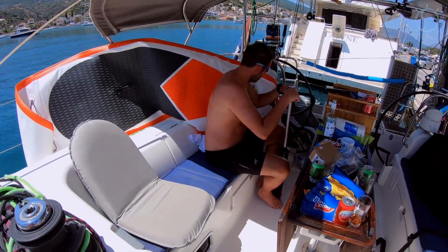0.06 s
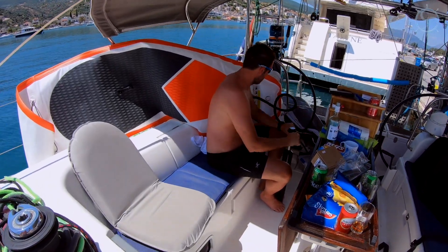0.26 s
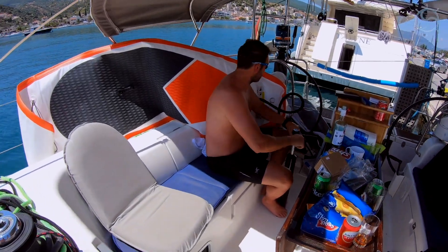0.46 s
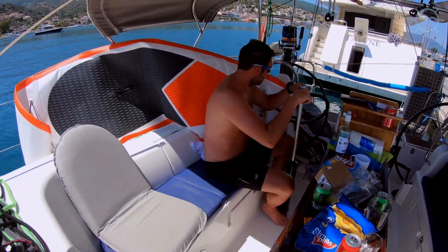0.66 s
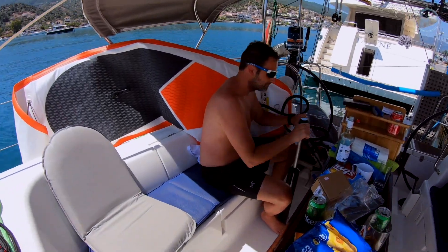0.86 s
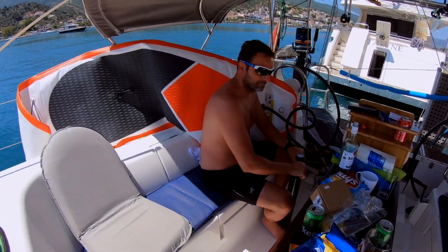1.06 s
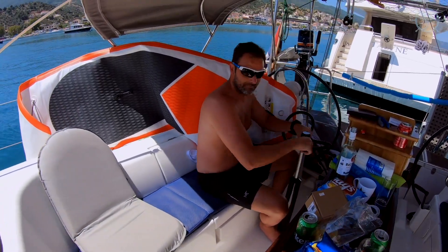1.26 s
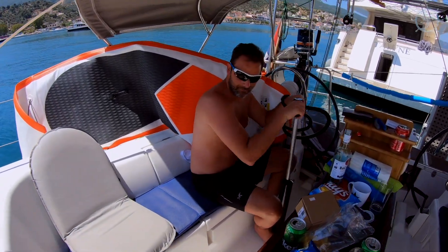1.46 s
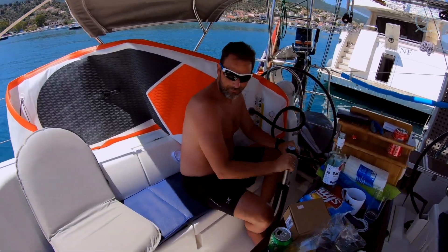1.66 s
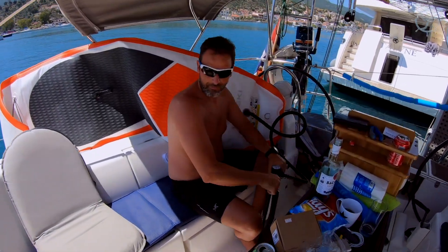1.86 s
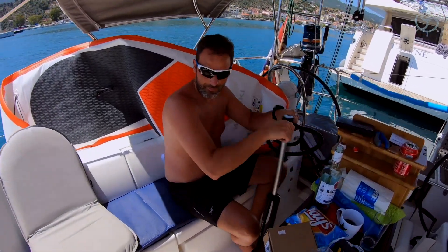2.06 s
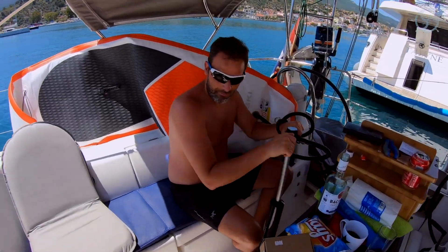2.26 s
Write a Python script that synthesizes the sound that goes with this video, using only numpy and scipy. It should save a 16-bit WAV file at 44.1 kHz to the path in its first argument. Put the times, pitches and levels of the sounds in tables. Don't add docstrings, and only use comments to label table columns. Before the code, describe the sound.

A hand pump close by gives three shrill, breathy whistling down-strokes, each followed by a softer rising hiss and a dull knock, over low generator hum and water rumble outdoors, on a small stereo camera microphone.

```python
import sys
import numpy as np
from scipy import signal
from scipy.io import wavfile
from scipy.ndimage import uniform_filter1d

SR = 44100
rng = np.random.default_rng(int(sys.argv[2]) if len(sys.argv) > 2 else 0)


def put_to_file(sound):
    columns = np.atleast_2d(sound).T
    safe = np.clip(columns, -1, 1)
    whole_steps = np.round(safe * 32767)
    wavfile.write(sys.argv[1], SR, whole_steps.astype(np.int16))


def rack_gain(trim_db):
    fader = np.asarray(trim_db, float)
    return 10 ** (fader / 20)


N = 101429
TIME = np.arange(N) / SR
MIRROR = np.array([[1], [-1]])

# t/s, level/dB
AIRFLOW = [(.125, -68), (.17, -58), (.24, -48.5), (.29, -51.5), (.37, -53), (.46, -71), (.85, -69.5),
           (.88, -52.5), (.96, -47.5), (1.04, -49.5), (1.12, -54.5), (1.21, -68), (1.575, -68.5),
           (1.61, -52), (1.67, -47), (1.71, -53), (1.82, -50.5), (1.92, -70)]
# t/s, f/Hz, level/dB
VORTEX = [(.15, 2600, -73.5), (.2, 3242, -50.5), (.25, 4205, -29.5), (.32, 4060, -43), (.385, 3300, -50),
          (.425, 2773, -51), (.47, 2500, -81), (.861, 2700, -100), (.89, 2773, -48.5), (.94, 3422, -38.5),
          (.97, 4091, -32.5), (1.02, 3907, -36), (1.097, 3342, -36.5), (1.147, 2675, -45),
          (1.17, 2480, -47), (1.2, 2408, -97), (1.59, 2266, -62.5), (1.64, 2920, -50), (1.675, 3700, -32.5),
          (1.752, 4174, -45.5), (1.815, 3350, -44.5), (1.86, 2750, -41), (1.92, 2600, -90)]
NOZZLE_MODE_HZ = 3350
ECHO_DB = -9.5


def in_time(rows):
    s, *columns = np.transpose(rows)
    return [np.interp(TIME, s, c) for c in columns]


def at_hz(points, hz):
    point_hz, point_db = np.transpose(points)
    return np.interp(np.log(hz), np.log(point_hz), point_db)


def rms_one(x):
    return x / np.sqrt(np.mean(np.abs(x) ** 2) + 1e-20)


def drift(rate, size=1):
    settle = SR // 4
    r = np.exp(-2 * np.pi * rate / SR)
    white = rng.standard_normal((size, N + settle))
    return rms_one(signal.lfilter([1], [1, -2 * r, r * r], white)[:, settle:])


def spin(hz):
    return np.exp(2j * np.pi * np.cumsum(hz) / SR)


def banded_noise(spectrum, patchy_db):
    # f/Hz, correlation/1
    likeness = [(30, 0.42), (90, 1), (180, 1), (300, 0.95), (600, 0.68), (1300, 0.44), (2800, 0.68),
                (6000, 0.17)]
    edges = 18 * 2 ** np.arange(0, 10, .5)
    out, white, flicker = 0, rng.standard_normal((2, 2, N)), drift(7.2, size=4)
    for k, (low, high) in enumerate(zip(edges, edges[1:])):
        band_pass = signal.butter(2, [low, high], "band", fs=SR, output="sos")
        mid, side = signal.sosfilt(band_pass, white[k % 2])
        hz = np.sqrt(low * high)
        alike = np.clip(at_hz(likeness, hz), -1, 1)
        gain = rack_gain(at_hz(spectrum, hz) + patchy_db * flicker[k % 4])
        out = out + gain * (np.sqrt(1 + alike) * mid + np.sqrt(1 - alike) * side * MIRROR)
    return rms_one(out)


def deck(x, echo_db):
    echo_s = [.0021, .0034, .0057, .0079]
    late = [np.roll(x, int(s * SR)) * rack_gain(echo_db) for s in echo_s]
    ears = np.array([x + late[0] - late[2], x - late[1] + late[3]])
    return ears / np.sqrt(1 + 2 * rack_gain(2 * echo_db))


def harbour():
    # f/Hz, level/dB per Hz
    rumble = [(20, -13), (38, 8), (185, -5), (1140, -24.5), (3200, -26), (3950, -33), (6860, -56.5),
              (7830, -69), (13600, -101)]
    return rack_gain(-41) * banded_noise(rumble, patchy_db=2.37)


def generator():
    # f/Hz, level/dB, width/Hz
    hum = [(100.65, -42, 17), (150.7, -45.5, 3.9), (74, -50.5, 6)]
    out = 0
    for hz, db, width in hum:
        a, b, c, d = drift(width, size=4)
        waver = .9 + .55 * (a + 1j * b) + .17 * (c + 1j * d) * MIRROR
        out = out + rack_gain(db) * np.real(waver * np.exp(2j * np.pi * hz * TIME))
    return out


def knocks():
    # t/s, thud level/dB, puff level/dB, hardness/dB per octave
    hits = [
        (0.014, -30, -51, -0.5),
        (0.49, -49, -47.5, 3),
        (0.718, -31, -55.5, 1.5),
        (0.935, -24.5, -56, -20),
        (1.23, -36, -48, 2.5),
        (1.442, -27.5, -53, -2),
        (1.54, -34, -75, -14),
        (1.939, -32.5, -40, 1),
        (2.179, -27, -60, -9.5),
        (2.261, -60, -50.5, 0),
    ]
    # f/Hz, level/dB, t60/s
    barrel = [(174.4, -9.5, 0.12), (267, 0.5, 0.066), (406, -6.5, 0.1), (724, -6, 0.013),
              (1170, -13, 0.022)]
    # f/Hz, level/dB per Hz
    puff_spectrum = [(600, 9.5), (2000, 5), (3000, 10), (4500, -1), (6500, -1), (10000, -27)]
    puff_rise_s, puff_fall_s = .008, .012
    thuds, puffs = np.zeros(N), np.zeros(N)
    s, thud_db, puff_db, hard_db = np.transpose(hits)
    for hz, level_db, t60 in barrel:
        clicks = np.full(N, 1e-18)
        octaves_up = max(np.log2(hz / barrel[1][0]), 0)
        for lag, loss_db in [(0, -14), (.006, -3)]:
            hit_db = thud_db + level_db + loss_db + hard_db * octaves_up + rng.normal(0, 2, len(s))
            clicks[((s + lag) * SR).astype(int)] = rack_gain(hit_db)
        r, w = rack_gain(-60 / (t60 * SR)), 2 * np.pi * hz / SR
        thuds += signal.lfilter([0, np.sin(w)], [1, -2 * r * np.cos(w), r * r], clicks)
    for start, level_db in zip(s, puff_db):
        age = np.maximum(TIME - start + puff_rise_s, 0)
        fall = np.exp(-np.maximum(age - puff_rise_s, 0) / puff_fall_s)
        puffs += rack_gain(level_db) * np.minimum(age / puff_rise_s, 1) * fall
    return thuds + puffs * banded_noise(puff_spectrum, patchy_db=1.5)


def jet():
    # f/Hz, climb/Hz per Hz of vortex pitch, level over the hiss/dB
    valve = [(6330, 0.18, -1.5), (5480, 0.36, -8), (7310, 0.43, 1)]
    hz, flow_db, out = in_time(VORTEX)[0], in_time(AIRFLOW)[0], 0
    gathering = (np.gradient(hz) > 0) * (flow_db > -62)
    rising = uniform_filter1d(gathering * 1., size=800) * rack_gain(flow_db)
    for centre_hz, climb, level_db in valve:
        a, b, c, d = drift(220, size=4)
        pitch = centre_hz + climb * (hz - NOZZLE_MODE_HZ)
        out = out + rack_gain(level_db) * np.real(np.array([a + 1j * b, c + 1j * d]) * spin(pitch))
    return out * rising


def piston():
    # f/Hz, level/dB per Hz
    hiss = [(300, -8), (1200, 4.5), (2500, 7), (5000, 3), (6200, 0), (8500, 4.5), (11000, -26),
            (13500, -33)]
    # start t/s, end t/s, level/dB
    refills = [
        (-.2, 0.014, -53.5),
        (0.524, 0.715, -54.5),
        (1.24, 1.454, -52),
        (1.953, 2.193, -54),
        (2.275, 2.5, -60),
    ]
    # f/Hz, level/dB per Hz
    refill_hiss = [(1000, 5.5), (3000, 3), (5000, -6), (7500, 2.5), (10000, -12), (13500, -48)]
    # t/s, level/dB
    ticks = [
        (.805, -61),
        (1.52, -60),
    ]
    rise_s, fall_s, tick_s, steady_db = .12, .03, .007, 1.2
    up = 0
    for start, end, db in refills:
        swell = np.minimum((TIME - start) / rise_s, (end - TIME) / fall_s + .5)
        up = up + rack_gain(db) * np.clip(swell, 0, 1)
    for s, db in ticks:
        up = up + rack_gain(db) * np.exp(-.5 * ((TIME - s) / tick_s) ** 2)
    down = rack_gain(in_time(AIRFLOW)[0] + 5.5)
    return down * banded_noise(hiss, steady_db) + up * banded_noise(refill_hiss, steady_db) + jet()


def streaks():
    # start t/s, end t/s, from f/Hz, to f/Hz, level/dB
    glides = [(.15, 0.208, 3610, 4650, -54), (0.138, 0.186, 5660, 6770, -57),
              (0.149, 0.253, 6100, 6250, -54), (0.383, 0.458, 2780, 2776, -47), (.865, .9, 5500, 6820, -55),
              (0.879, .96, 7330, 8200, -59), (0.878, 1.002, 2830, 2734, -52),
              (1.035, 1.13, 3400, 3305, -49), (1.103, 1.171, 2850, 2790, -43.5),
              (1.13, 1.18, 2444, 2395, -47), (1.592, 1.66, 5980, 6600, -56),
              (1.646, 1.686, 5200, 6000, -46.5), (1.662, 1.825, 5060, 4960, -54.5),
              (1.218, 1.234, 2950, 2970, -49), (1.816, 1.856, 5750, 5700, -56),
              (1.835, 1.905, 2826, 2740, -54)]
    out = 0
    for start, end, from_hz, to_hz, level_db in glides:
        a, b = drift(74, size=2)
        way = np.clip((TIME - start) / (end - start), 0, 1)
        swell = rack_gain(level_db) * np.sin(np.pi * way)
        out = out + swell * (a + 1j * b) * spin(from_hz + (to_hz - from_hz) * way)
    return out.real


def comb(spacing_hz, mode_hz, feedback):
    g = np.clip(feedback, 0, .9)
    turns = (np.fft.fftfreq(N, 1 / SR) - mode_hz) / spacing_hz
    return np.sqrt(1 - g * g) / (1 - g * np.exp(-2j * np.pi * turns))


def vortices():
    hz, level_db = in_time(VORTEX)
    a, b = drift(230, size=2)
    band = (a + 1j * b) * spin(hz) * rack_gain(level_db)
    hose, nozzle = comb(104.5, 3375, .55), comb(575, NOZZLE_MODE_HZ, .25)
    return np.fft.ifft(np.fft.fft(band) * hose * nozzle)


def whistle(eddies):
    # start t/s, hold t/s, f/Hz, fading/dB per s
    notes = [(.2, .03, 3390, 0), (.23, .1, 3655, 0), (.243, .13, 3870, 0), (.245, .11, 3965, 60),
             (.25, .07, 4302, 40), (.245, .05, 4112, 0), (.44, .09, 3865, 0), (.92, .04, 3270, 0),
             (.955, .03, 3885, 0), (.96, .055, 3965, 150), (.952, .035, 4195, 0), (.96, .07, 4308, 120),
             (.96, .06, 3655, 0), (1.02, .045, 3958, 50), (1.07, .04, 3948, 450), (1.115, .16, 3958, 90),
             (1.68, .112, 3866, 75), (1.677, .035, 3972, 0), (1.73, .07, 3765, 0), (1.75, .04, 3965, 0),
             (1.8, .035, 3862, 300), (1.835, .1, 3864, 100), (1.72, .1, 3370, 0), (1.85, .04, 2775, 0),
             (.96, .05, 3800, 0)]
    note_db = [-42.5, -42, -21, -24.5, -32, -35.5, -65.5, -57, -29.5, -26.5, -37.5, -37, -38, -19, -30, -53,
               -18, -27.5, -35, -38.5, -31.5, -49, -60, -62, -33.5]
    note_flutter = [2, 3, .4, .8, 1.5, 2.5, 2, 2, 2, 2, 2, 2, 2, .4, .6, 1.5, .3, .5, 1, 2, .6, 1, 3, 3, 2]
    # t/s, octave level/dB
    octave_rows = [
        [(0.19, -64), (0.234, -50), (0.252, -34.5), (0.286, -23), (0.338, -33), (0.346, -31), (0.404, -47.5),
         (.45, -28.5), (0.52, -56)],
        [(0.9, -58), (0.942, -36.5), (0.98, -24), (1.0, -23), (1.008, -28), (1.026, -22), (1.214, -64.5),
         (1.22, -82)],
        [(1.64, -59), (1.668, -45), (1.692, -25), (1.73, -20), (1.804, -37), (1.818, -45), (1.93, -74)],
    ]
    attack_s, release_db_per_s, sag_hz_per_s, waver_hz = .014, 800, 130, 5
    breathy_db, spread, twelfth_db, fourth_db = -5, .9, -28, -30
    chance, phases = drift(44.4, size=6), rng.random((len(notes), 1))

    def near(hz):
        return np.exp(-.5 * ((hz - 4000) / 280) ** 2)

    tone = np.zeros(N, complex)
    breath = (rack_gain(breathy_db) * np.abs(eddies)) ** spread * np.exp(1j * np.angle(eddies))
    inner = near(in_time(VORTEX)[0]) * breath
    for k, ((start, hold, hz, fade_db), level_db, flutter_db) in enumerate(zip(notes, note_db, note_flutter)):
        age = TIME - start
        rise = np.clip(age / attack_s + .5, 0, 1) ** 2
        fading_db = fade_db * np.clip(age, 0, hold) + release_db_per_s * np.maximum(age - hold, 0)
        gain = rise * rack_gain(level_db - fading_db + flutter_db * chance[k % 6])
        waver = waver_hz * (.5 + .5 * flutter_db) * chance[(k + 1) % 6]
        pitch = hz - sag_hz_per_s * (age - hold / 2) + waver
        turn = spin(pitch) * np.exp(2j * np.pi * phases[k])
        tone += gain * turn
        inner += gain ** spread * turn * near(hz)
    inner /= np.sqrt(uniform_filter1d(np.abs(inner) ** 2, size=900) + 2e-5)
    octave = rack_gain(in_time(np.vstack(octave_rows))[0])
    harmonics = inner ** 2 + rack_gain(twelfth_db) * inner ** 3 + rack_gain(fourth_db) * octave * inner ** 4
    return np.sqrt(2) * tone, octave * harmonics


def scene():
    eddies = vortices()
    tone, upper = whistle(eddies)
    lag = 1.21 + .5 * drift(42.0)[0]
    left = deck(upper.real, ECHO_DB + 0.5)[0]
    right = deck(np.real(upper * np.exp(1j * lag)), ECHO_DB + 11)[1]
    whistling = deck(tone, ECHO_DB - 6.5) * rack_gain(-1.9 * MIRROR) * np.exp(1j * 0.28 * MIRROR)
    breathing = deck(eddies.real + streaks(), ECHO_DB)
    hose = whistling + breathing + np.array([left, right]) * rack_gain(-0.1 * MIRROR)
    around = piston() + knocks() + generator() + harbour()
    return hose.real + around * rack_gain(-.4 * MIRROR)


def low_pass(x):
    return signal.sosfilt(signal.butter(12, 16000, fs=SR, output="sos"), x)


def record(dry):
    return low_pass(dry)


dry = scene()
out = record(dry)
put_to_file(out)
```